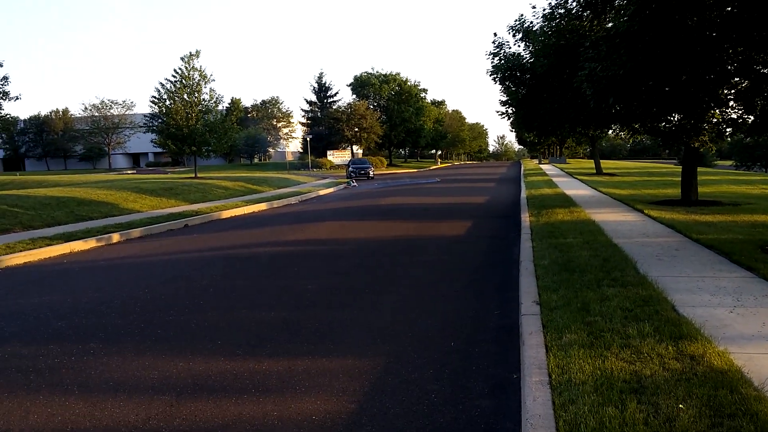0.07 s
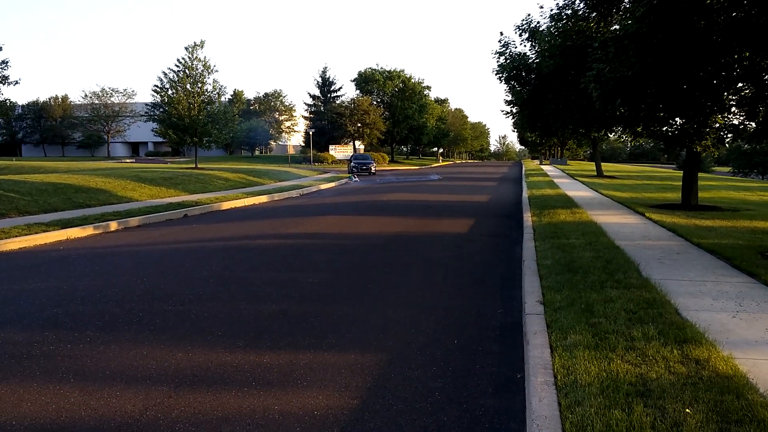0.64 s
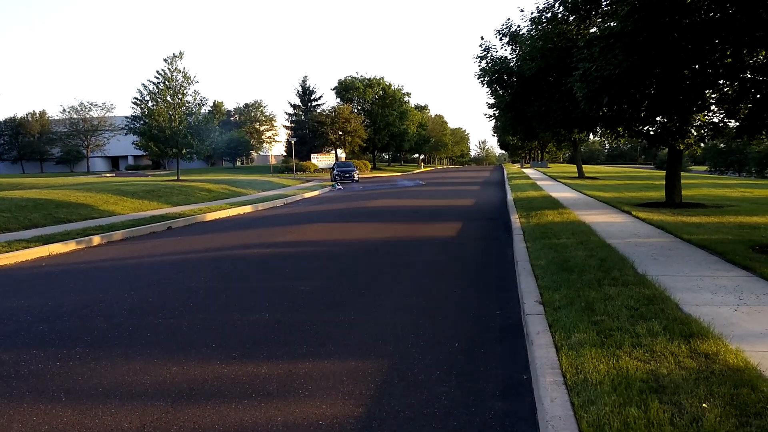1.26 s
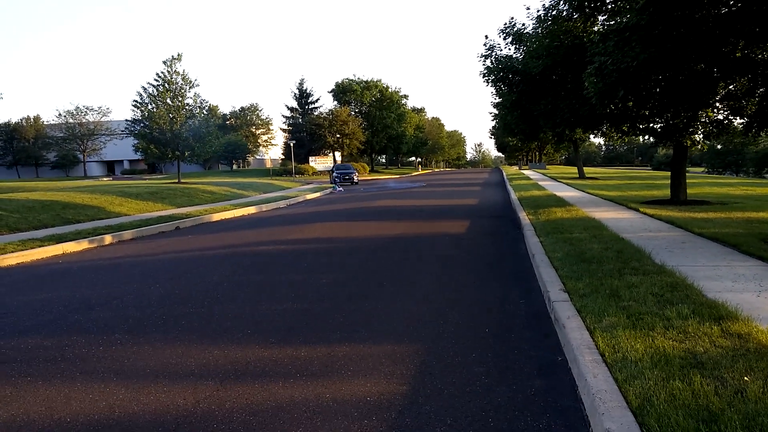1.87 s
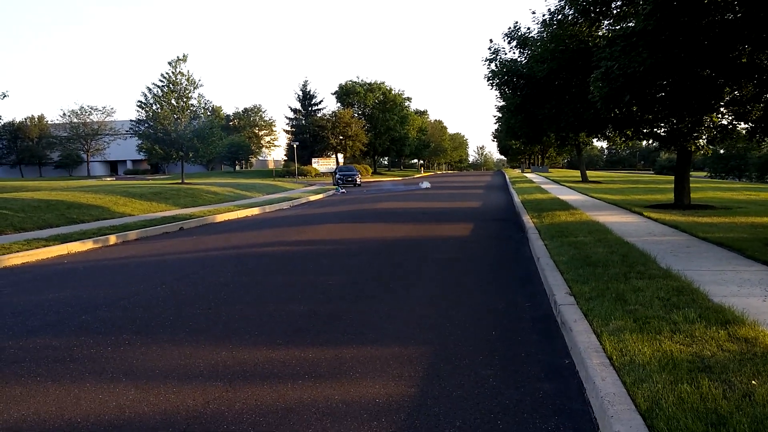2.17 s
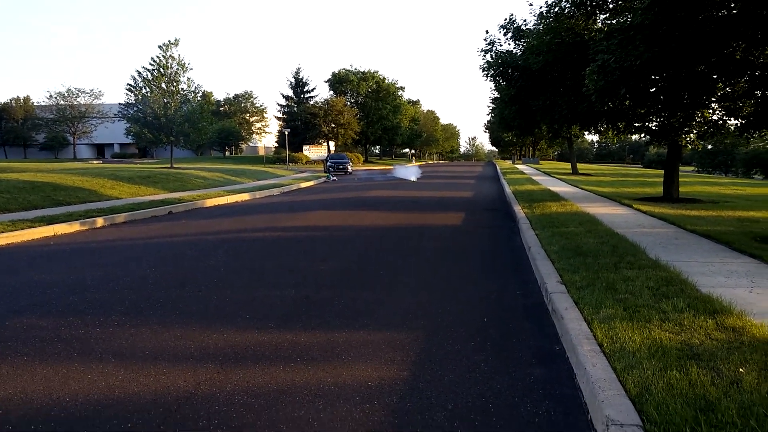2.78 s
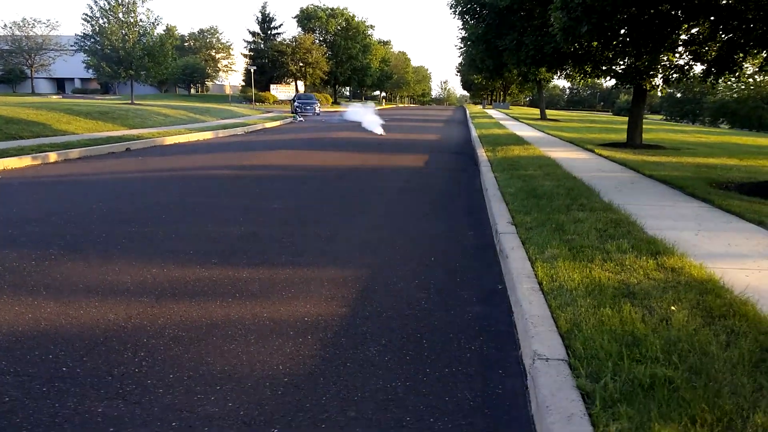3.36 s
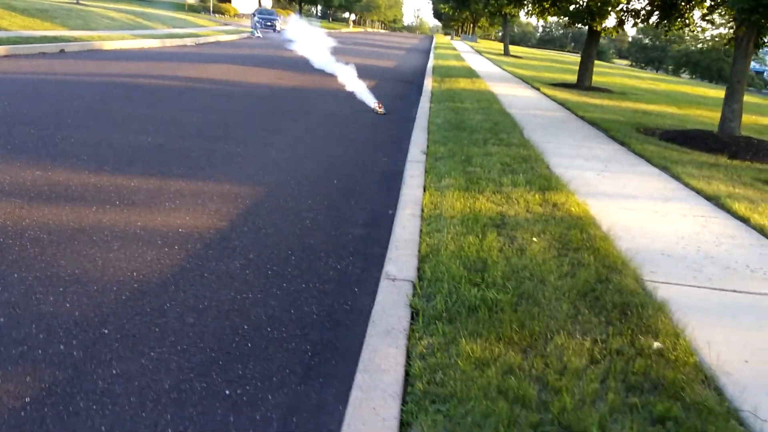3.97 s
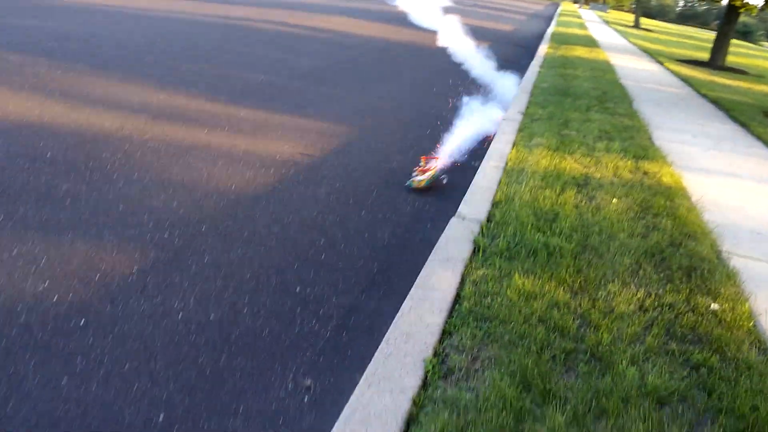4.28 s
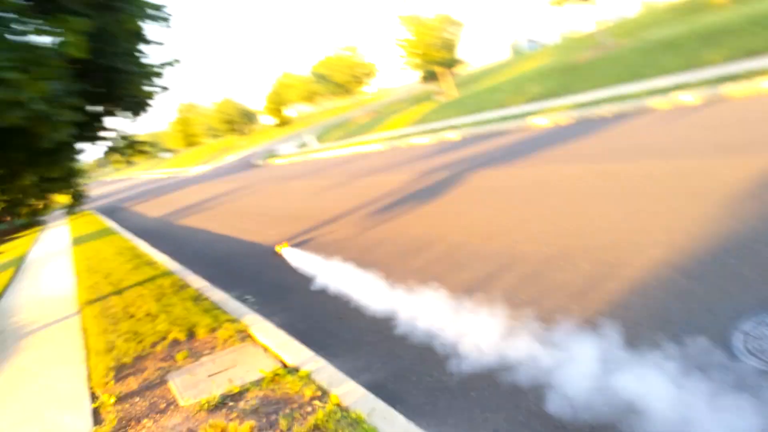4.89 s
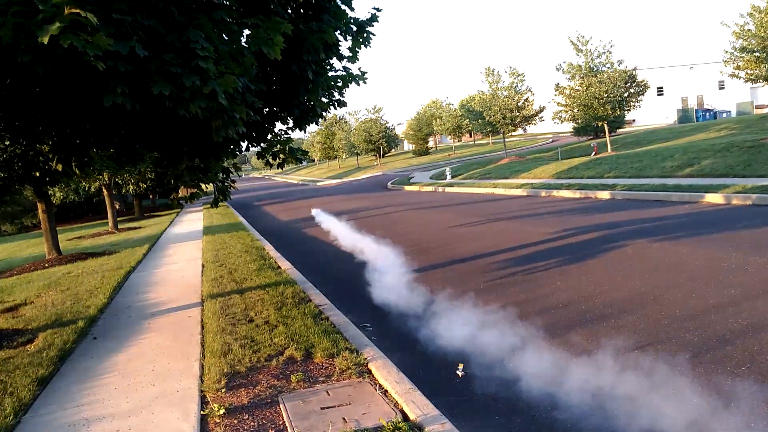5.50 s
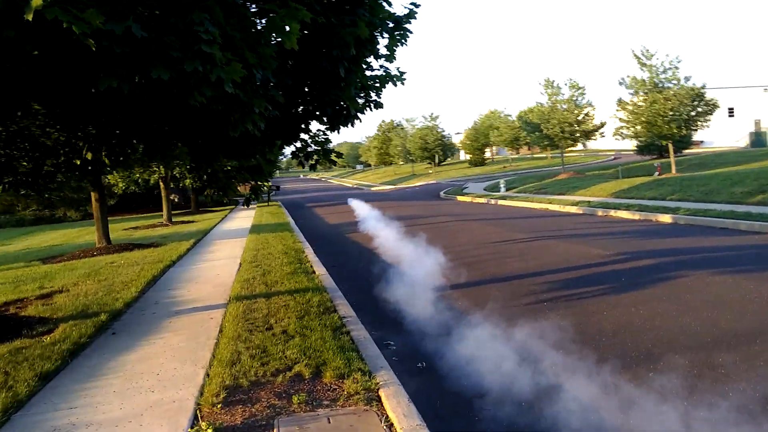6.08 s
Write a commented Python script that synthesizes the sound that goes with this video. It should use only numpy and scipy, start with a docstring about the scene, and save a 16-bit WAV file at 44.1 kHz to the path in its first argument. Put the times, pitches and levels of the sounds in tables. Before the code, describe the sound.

A toy rocket car fizzes and crackles alight far away, then rushes past with a loud hiss and fades down a quiet road.

```python
"""A quiet road, with distant traffic, birds and a few handling ticks. Far up it a toy car lights its
model rocket engines with a fizz and a crackle, races at a hand-held camera, knocks over bumps and speeds
away. Turbulent mixing in the jet radiates a rushing hiss that obeys the inverse-distance law and is
coloured by its direction and by the resonances of two microphone ports. Air buffets the ports as the
camera swings round, and the gain control ducks the pass."""
import sys
import numpy as np
from scipy import signal
from scipy.fft import rfft, irfft
from scipy.io import wavfile
from scipy.ndimage import uniform_filter1d, minimum_filter1d

SR = 44100
rng = np.random.default_rng(int(sys.argv[2]) if len(sys.argv) > 2 else 0)


def file_out(sig):
    """Save sig as 16-bit WAV at sys.argv[1]."""
    # one column per channel
    cols = np.atleast_2d(sig).T
    # limit, then scale
    lim = np.clip(cols, -1, 1)
    pcm = np.round(lim * 32767).astype(np.int16)
    wavfile.write(sys.argv[1], SR, pcm)


N = 270639
FRAME, HOP = 1024, 256
TIME = np.arange(N) / SR
FRAME_S = np.arange(N // HOP + 5) * HOP / SR
BIN_HZ = np.fft.rfftfreq(FRAME, 1 / SR)


def amp(db):
    """Amplitude ratio of a level in decibels."""
    return 10 ** (np.asarray(db) / 20)


def unit(x):
    """Normalisation to an rms of 1."""
    return x / np.sqrt(np.mean(x ** 2) + 1e-20)


def swell(x, centre, half_width):
    """Gaussian bell of height 1."""
    return np.exp(-((x - centre) / half_width) ** 2)


def within(metres, reach):
    """Smooth window: 1 well inside the reach, 0 well outside."""
    return 1 / (1 + (metres / reach) ** 6)


def follow(rows):
    """Linear interpolation of each level column over time."""
    times, *columns = np.transpose(rows)
    return [np.interp(TIME, times, column) for column in columns]


def colour(points, hz=BIN_HZ):
    """Spectral envelope in dB, interpolated in log frequency."""
    f, db = np.transpose(points)
    return np.interp(np.log(hz + 1), np.log(f + 1), db)


def bumps(modes, hz=BIN_HZ):
    """Gaussian peaks and dips in dB, with widths taken at half height."""
    return sum(db * 2 ** -((2 * (hz - f) / width) ** 2) for f, width, db in modes)


def add(mix, start_s, sound):
    """Superposition of a short sound on the mix."""
    part = mix[..., round(start_s * SR):][..., :sound.shape[-1]]
    part += sound[..., :part.shape[-1]]


def noise_pair(field_db, coherence):
    """Short-time spectra of two partially coherent noises, left and right."""
    a, b, c, d = rng.standard_normal((4, len(FRAME_S), len(BIN_HZ)))
    left = a + 1j * b
    right = coherence * left + np.sqrt(1 - coherence ** 2) * (c + 1j * d)
    return amp(field_db) * np.array([left, right])


def waveform(spectra):
    """Overlap-add synthesis from short-time spectra."""
    return signal.istft(spectra.swapaxes(1, 2), nperseg=FRAME, noverlap=FRAME - HOP)[1][:, :N]


def patches(frames, bins):
    """Random field, correlated over patches of time and frequency."""
    white = rng.standard_normal((len(FRAME_S), len(BIN_HZ)))
    return unit(uniform_filter1d(uniform_filter1d(white, frames, 0), bins, 1))


# resonances and dips of each microphone port: f/Hz, width/Hz, gain/dB
LEFT_PORT_MODES = [(1610, 77, 1), (2400, 150, 3), (8000, 330, -9)]
RIGHT_PORT_MODES = [(1190, 1600, -1.5), (2800, 1130, -7), (4080, 2900, 4), (6180, 1760, 3), (9180, 1420, 9),
                    (9960, 1740, 9), (12800, 1800, -3)]

def ports(hz=BIN_HZ):
    """Resonance gives each port its own frequency response, in dB."""
    return np.array([bumps(LEFT_PORT_MODES, hz), bumps(RIGHT_PORT_MODES, hz)])


# spectrum of distant traffic and open air: f/Hz, relative level/dB
TRAFFIC_SPECTRUM = [(15, -45), (25, -15), (48, -17), (84, 0.5), (144, -5.5), (198, -16), (233, -9),
                    (267, -20.5), (399, -15.5), (919, -21), (1080, -24), (1620, -28.5), (3830, -39.5),
                    (4380, -40.5), (15500, -49)]
# soft bands of leaves and far birds: f/Hz, width/Hz, gain/dB
FOLIAGE_BANDS = [(880, 190, 7), (1750, 790, 6.5), (3360, 900, -1), (4800, 1100, 3.5)]

def street(level_db=-50, ease_db_per_s=1.3, hiss_db=-80, coherent_hz=650, lag_ms=0.24):
    """Far traffic under a faint rustle and hiss; long wavelengths reach both ports coherently."""
    ports_db = ports()
    ports_db[1] *= BIN_HZ < 6000
    field_db = colour(TRAFFIC_SPECTRUM) + bumps(FOLIAGE_BANDS) + patches(frames=20, bins=8)
    coherence = 0.99 / (1 + (BIN_HZ / coherent_hz) ** 2)
    spectra = noise_pair(field_db + ports_db[:, None], coherence)
    spectra[0] *= np.exp(-2j * np.pi * BIN_HZ * lag_ms / 1000)
    rumble = unit(waveform(spectra)) * amp(level_db - ease_db_per_s * TIME)
    return rumble + amp(hiss_db) * rng.standard_normal((2, N))


# far bird calls: t/s, duration/s, start f/Hz, end f/Hz, level/dB
BIRD_CALLS = [(0.107, 0.11, 1610, 1560, -61), (0.197, 0.16, 1560, 1750, -66), (.92, 0.1, 4280, 4150, -72),
              (0.938, 0.031, 2520, 2560, -63), (0.998, 0.024, 2700, 2740, -63),
              (1.16, 0.083, 4900, 5200, -72), (1.934, 0.085, 4370, 4150, -66),
              (2.036, .05, 4500, 4700, -71)]

def birds(blur=0.041):
    """Gliding whistles; random frequency modulation stands for their blurring by the trees."""
    out = np.zeros((2, N))
    for start_s, duration, start_hz, end_hz, db in BIRD_CALLS:
        n = round(duration * SR)
        waver = unit(uniform_filter1d(rng.standard_normal((2, SR)), size=60))[:, :n]
        hz = np.linspace(start_hz, end_hz, n) * (1 + blur * waver)
        phase = 2 * np.pi * np.cumsum(hz, axis=1) / SR
        add(out, start_s, 2 * amp(db) * np.hanning(n) * np.sin(phase))
    return out


# handling ticks: t/s, level/dB, T60/s
HANDLING_TICKS = [(.0353, -43, .025), (1.5379, -33, .016), (1.5775, -39, .05)]
# handling rustle around the last two ticks: t/s, level/dB
HANDLING_RUSTLE = [(1.2, -79), (1.5, -64.5), (1.6, -59), (1.7, -68), (2.1, -83), (2.3, -110)]
# spectrum of both: f/Hz, relative level/dB
HANDLING_SPECTRUM = [(500, -14), (1300, -2), (1900, 4.5), (2400, -1), (3100, -3), (4200, -13), (6000, -8.5),
                     (8000, -24), (14000, -46)]

def handling(tail_db=-24, tail_t60=0.15):
    """Dry ticks in a faint rustle: noise bursts with a fast exponential decay and a weak, slower tail."""
    rustle = unit(waveform(noise_pair(colour(HANDLING_SPECTRUM), coherence=0.3)))
    out = amp(follow(HANDLING_RUSTLE)[0]) * rustle
    t = np.arange(16384) / SR
    response = amp(colour(HANDLING_SPECTRUM, np.fft.rfftfreq(len(t), 1 / SR)))
    for start_s, db, t60 in HANDLING_TICKS:
        white = rng.standard_normal(len(t)) + rng.standard_normal((2, len(t)))  # common + separate
        burst = unit(irfft(rfft(white) * response))
        decay = amp(-60 * t / t60) + amp(tail_db - 60 * t / tail_t60)
        add(out, start_s, amp(db) / 2 * burst * decay)
    return out


# spectrum of turbulence at the ports: f/Hz, relative level/dB
WIND_SPECTRUM = [(15, -28), (35, -1), (65, -1), (100, 5), (170, -12.5), (280, -15), (1500, -75)]
# swells of low rumble at the ports; the later ones, hardest as the camera swings round, are gusts: t/s, half-
# width/s, level/dB, left minus right/dB
WIND_GUSTS = [(2.1, .14, -56, 8), (2.627, 0.13, -48, -14), (3.2, 0.38, -52, -5), (3.594, 0.055, -35.5, -20),
              (3.698, 0.023, -23.5, 5), (3.773, 0.045, -39, 16), (3.87, .025, -33, -21),
              (4.07, 0.096, -26.5, -5.5), (4.204, .04, -26, 0), (4.336, 0.08, -23.5, 2),
              (4.5, 0.037, -29.5, 7), (4.634, 0.07, -16, -2), (4.823, 0.1, -14.5, -2),
              (4.948, 0.03, -12.5, 0), (5.01, 0.055, -29, 1)]
# single pressure pulses: t/s, peak level/dB, half-width/s
WIND_BUFFETS = [(4.297, -12, 0.001), (4.341, -7, 0.0012)]

def wind():
    """Turbulent pressure is local, so the ports rumble incoherently; two hard buffets strike both."""
    power = sum((amp(db + np.array([[pan_db], [-pan_db]]) / 2) * swell(TIME, centre_s, half_s)) ** 2
                for centre_s, half_s, db, pan_db in WIND_GUSTS)
    spectra = noise_pair(colour(WIND_SPECTRUM) - patches(frames=5, bins=20), coherence=0)
    out = unit(waveform(spectra)) * np.sqrt(power)
    for centre_s, db, half_s in WIND_BUFFETS:
        u = (TIME - centre_s) / half_s
        out += amp(db) * u * np.exp((1 - u ** 2) / 2)
    return out


# modes of the car's light body: f/Hz, relative level/dB, T60/s
BODY_MODES = [(232, -15, .03), (487, 9, 0.044), (730, 9, 0.022), (1230, -9, 0.018), (2300, 0, 0.019)]
# impacts on bumps in the road: t/s, peak level/dB
ROAD_IMPACTS = [(4.3146, -12), (5.046, -3), (5.279, -16)]

def knocks():
    """Each impact excites the body's damped normal modes, giving a short hollow knock."""
    out, t = np.zeros(N), np.arange(4096) / SR
    ring = sum(amp(db - 60 * t / t60) * np.sin(2 * np.pi * hz * t) for hz, db, t60 in BODY_MODES)
    for start_s, db in ROAD_IMPACTS:
        add(out, start_s, amp(db) * ring / abs(ring).max())
    return out


# the igniter's fizz and the catching propellant's crackle: t/s, fizz level/dB, crackle level/dB
IGNITION_LEVELS = [(2.222, -80, -104), (2.238, -53, -85), (2.29, -48.5, -57), (2.34, -37.5, -51),
                   (2.4, -29, -31), (2.47, -50, -23.5), (2.56, -74, -31), (2.7, -100, -100)]
# spectrum of the fizz: f/Hz, relative level/dB
FIZZ_SPECTRUM = [(1200, -15), (2400, -2), (4500, 3), (6500, -1), (8000, -24), (12000, -32)]
# sharp spits as the engines catch: t/s, level/dB
IGNITION_SPITS = [(2.4337, -5), (2.4683, -16)]

def ignition(ring_hz=1620, decay_s=0.0011, shocks_per_s=260):
    """A thin fizz, then shot noise: small random shocks, each a steep front with a very short ring."""
    fizz_db, crackle_db = follow(IGNITION_LEVELS)
    t = np.arange(400) / SR
    shock = -np.exp(-t / decay_s) * np.cos(2 * np.pi * ring_hz * t)
    shock = np.convolve(shock, np.hanning(7) / np.hanning(7).sum())  # finite rise time
    sparks = rng.exponential(1, N) * (rng.random(N) < shocks_per_s / SR)
    crackle = amp(crackle_db) * unit(signal.oaconvolve(sparks, shock)[:N])
    for start_s, db in IGNITION_SPITS:
        add(crackle, start_s, amp(db) * shock)
    fizz = amp(fizz_db) * unit(waveform(noise_pair(colour(FIZZ_SPECTRUM), coherence=0.1)))
    return (TIME > IGNITION_LEVELS[0][0]) * (crackle + fizz)


def path(t, pass_s=4.824, speed_m_per_s=14.17, side_m=1.46):
    """Uniform straight motion: metres past the camera, and distance from it."""
    along = speed_m_per_s * (t - pass_s)
    return along, np.hypot(along, side_m)


LIGHT_S = 2.245  # the jet starts

def burn(t, level_db=20.5, sag_db_per_s=4):
    """Thrust builds, surges, then sags, setting the source level at 1 m and the tilt at 10 kHz, in dB."""
    age = np.maximum(t - LIGHT_S, 0)
    surge_db = 5.76 * swell(t, centre=2.604, half_width=0.15)
    dip_db = -18 * np.exp(-abs((t - 4.432) / 0.075) ** 3.1)  # the hiss dips briefly before the pass
    source_db = level_db - 76.5 * np.exp(-age / 0.091) + surge_db + dip_db - sag_db_per_s * age
    treble_db = -50 * np.exp(-age / 0.12) + 0.17 * surge_db + 0.14 * dip_db  # the treble builds late
    return source_db, treble_db


def roar(along, distance, ahead):
    """Hollow spectral peaks, in dB, that climb as the car nears, broaden close by and fall as it leaves."""
    close = within(distance, reach=14.4)
    climbing_hz = 1666 + 650 * within(distance, reach=15.4)
    falling_hz = 1080 + 2030 * np.exp(-np.maximum(along, 0) / 2.4)
    far_db = ahead * (1 - close ** 2) * bumps([(climbing_hz, 300, 5.4)])
    close_db = ahead * close * bumps([(1490, 1500, 3.7)])
    sweep_db = swell(along, centre=-2.36, half_width=0.64) * bumps([(370, 490, 2.6)])
    leaving_db = swell(along, centre=2.7, half_width=2.1) * bumps([(falling_hz, 580, 6.5)])
    return far_db + close_db + sweep_db + leaving_db


# jet spectra from far ahead, near ahead, abeam and behind: f/Hz, relative level/dB
JET_FAR = [(60, -24), (200, -17.5), (420, -6.5), (1000, -2.5), (1800, 0.5), (3200, -3.5), (4600, -2.5),
           (6000, -5.5), (7800, -2), (9300, -5.5), (11000, -7.5), (12400, -9), (13500, -15), (15500, -17)]
JET_NEAR = [(60, -23), (270, -11), (480, -4.5), (1000, -2), (1800, -2), (3200, -3.5), (4300, -5.5),
            (6000, -8), (7800, -3), (9300, -7.5), (11000, -4.5), (12400, -7.5), (13500, -8.5), (15500, -16)]
JET_ABEAM = [(60, -8.5), (200, 0), (420, -1.5), (1000, -0.2), (1800, -1), (3200, -1.5), (4600, -4.5),
             (6000, -2), (7800, 0.5), (9300, -2.5), (11000, -1), (12400, -8), (13500, -4.5), (15500, -8)]
JET_BEHIND = [(60, -33), (270, -16.5), (480, -9.5), (1000, -2), (1800, 1), (3200, -1.5), (4300, -1),
              (6000, -6), (7800, -2.5), (9300, -4.5), (11000, -6), (12400, -9), (13500, -12.5),
              (15500, -6.5)]
# reception from those four aspects:
# left minus right/dB, depth of port colour, share of ripple, left lag/ms, coherence cutoff f/Hz
JET_ASPECTS = [(-4, 0.94, 1.0, 0.068, 2200), (-4, 0.91, 0.35, 0.067, 1840), (-0.1, 0.27, 0.061, 0.02, 120),
               (-1.4, 0.4, 0.26, -0.051, 2700)]
# interference with reflections from the road and the camera's holder: f/Hz, width/Hz, gain/dB
REFLECTION_RIPPLE = [(198, 44, 2.5), (270, 98, -3.5), (477, 113, 4), (620, 127, -7), (855, 107, 5),
                     (983, 133, -8), (1170, 91, 2), (1460, 160, -2), (1786, 150, -8.5), (3160, 380, -2),
                     (4300, 470, 2)]
# added colour of the right port as the car drives away: f/Hz, width/Hz, gain/dB
RIGHT_PORT_LEAVING = [(2220, 1340, -5.5), (3650, 560, 1), (14000, 1900, -10)]

def jet(eddy_db=1.15, flutter_db=0.3, dull_db_per_m=1.57, bass_coherence=0.96, treble_coherence=0.04):
    """Turbulent mixing noise: directivity sets its colour and spherical spreading its level."""
    along, distance = path(FRAME_S[:, None])
    source_db, treble_db = burn(FRAME_S[:, None])
    abeam = within(along, reach=2.37)
    ahead, behind = (1 - abeam) * (along < 0), (1 - abeam) * (along >= 0)
    near = ahead * within(distance, reach=22.2)
    far = ahead - near
    reception = np.hstack([far, near, abeam, behind]) @ np.array(JET_ASPECTS)
    pan_db, port_depth, ripple, lag_ms, coherent_hz = reception.T[..., None]

    # the hiss brightens as the car closes in and dulls once it is well past
    bright = swell(along, centre=-8.5, half_width=4.3)
    gone_m = np.maximum(along - 10.3, 0)
    treble_db = treble_db + 3.5 * bright + 0.1 * abeam - dull_db_per_m * gone_m
    field_db = (far * colour(JET_FAR) + near * colour(JET_NEAR)
                + abeam * colour(JET_ABEAM) + behind * colour(JET_BEHIND))
    field_db += treble_db * BIN_HZ / 1e4
    field_db += ripple * bumps(REFLECTION_RIPPLE) + roar(along, distance, ahead)
    field_db += eddy_db * patches(frames=8, bins=28)  # the plume churns

    # the port resonances shift with direction and deepen as the car recedes
    tuning = 1 + 0.018 * bright - 0.02 * behind
    ports_db = (port_depth + 0.052 * gone_m) * ports(BIN_HZ / tuning)
    ports_db[1] += behind * bumps(RIGHT_PORT_LEAVING)
    heard_db = field_db + ports_db
    coherence = treble_coherence + (bass_coherence - treble_coherence) / (1 + (BIN_HZ / coherent_hz) ** 4)
    spectra = noise_pair(heard_db, coherence)
    spectra[0] *= np.exp(-2j * np.pi * BIN_HZ * lag_ms / 1000)
    spectra /= np.sqrt(np.mean(amp(heard_db) ** 2, axis=2, keepdims=True))  # equal power per frame

    level_db = np.interp(TIME, FRAME_S, (source_db - 20 * np.log10(distance))[:, 0])
    side_db = np.interp(TIME, FRAME_S, pan_db[:, 0]) / 2
    flutter = unit(uniform_filter1d(rng.standard_normal(N), size=700))  # the propellant burns unevenly
    gain = amp(level_db + flutter_db * flutter + np.array([side_db, -side_db]))
    return (TIME > LIGHT_S) * unit(waveform(spectra)) * gain


def gain_control(x, threshold_db=-6.5, ratio=5.9, hold_s=1, recover_db_per_s=54):
    """Compression: the gain drops at once above the threshold, holds, then recovers steadily."""
    power = abs(uniform_filter1d((x ** 2).mean(0), size=1200))
    cut_db = np.maximum(10 * np.log10(power + 1e-12) - threshold_db, 0) * (1 - 1 / ratio)
    hold = int(hold_s * SR)
    held_db = -minimum_filter1d(-cut_db, hold, origin=(hold - 1) // 2)
    recovery_db = recover_db_per_s * TIME
    return x / amp(np.maximum.accumulate(held_db + recovery_db) - recovery_db)


def scene():
    """Linear superposition of the rocket car, the wind and the quiet road."""
    return jet() + ignition() + knocks() + wind() + street() + handling() + birds()


def record(dry, ceiling=1.03, cutoff_hz=15820):
    """Compression ducks the pass, soft saturation rounds the peaks and a low-pass limits the band."""
    rounded = ceiling * np.tanh(gain_control(dry) / ceiling)
    low_pass = signal.firwin(511, cutoff_hz, window=("kaiser", 9), fs=SR)
    return signal.oaconvolve(rounded, low_pass[None], "same")


dry = scene()
out = record(dry)
file_out(out)
```